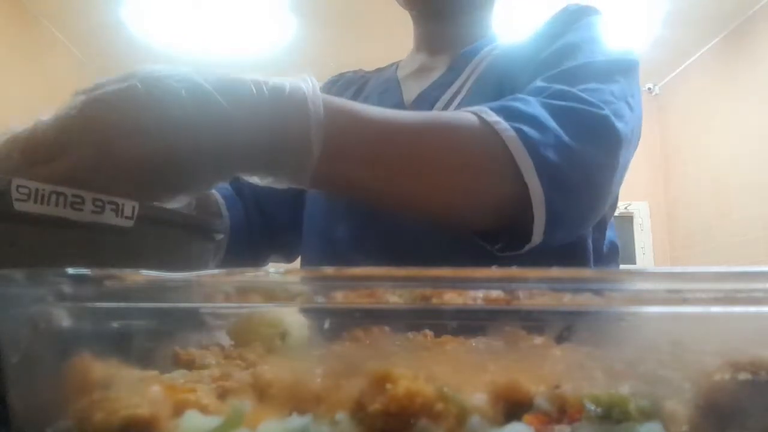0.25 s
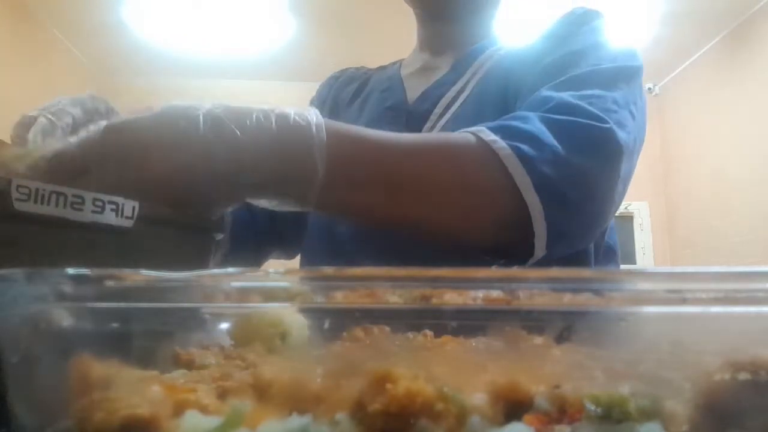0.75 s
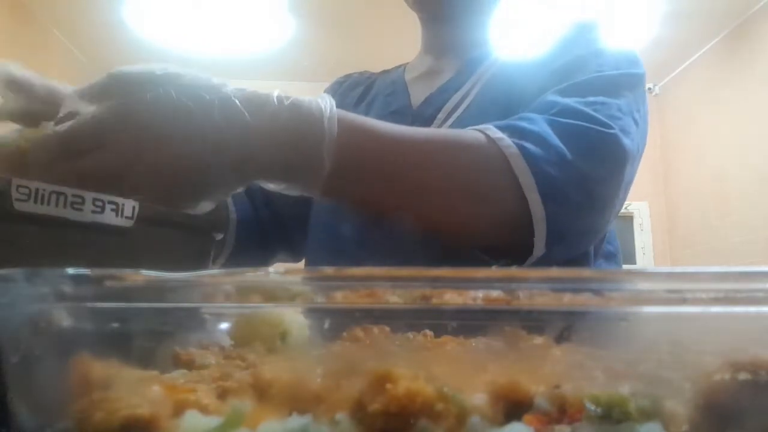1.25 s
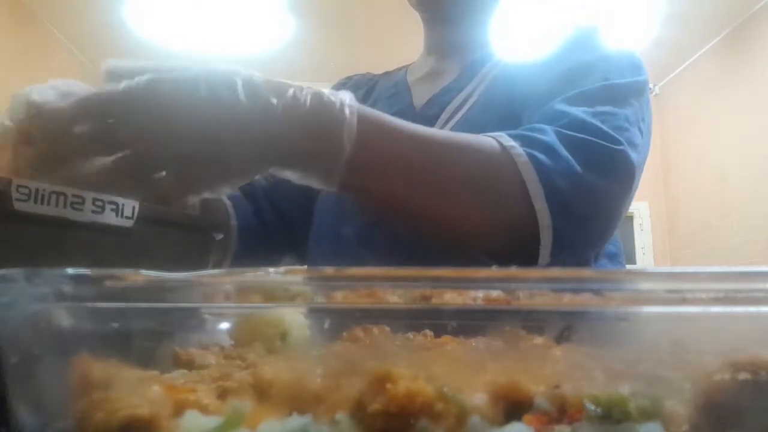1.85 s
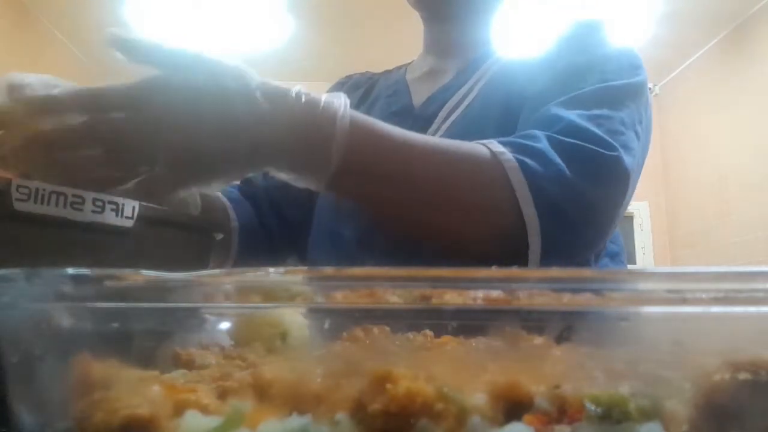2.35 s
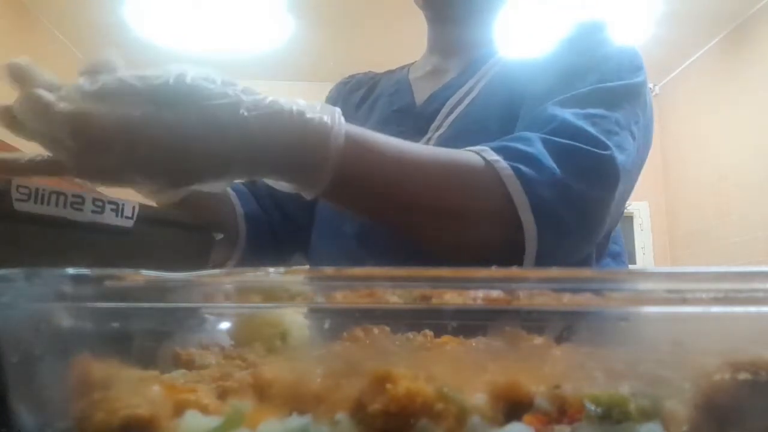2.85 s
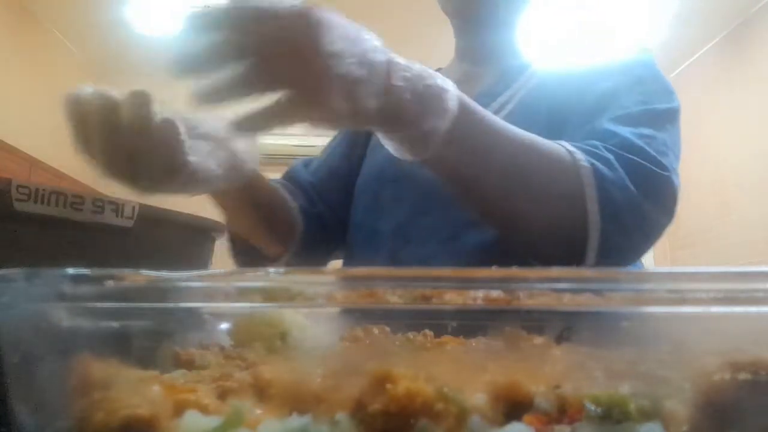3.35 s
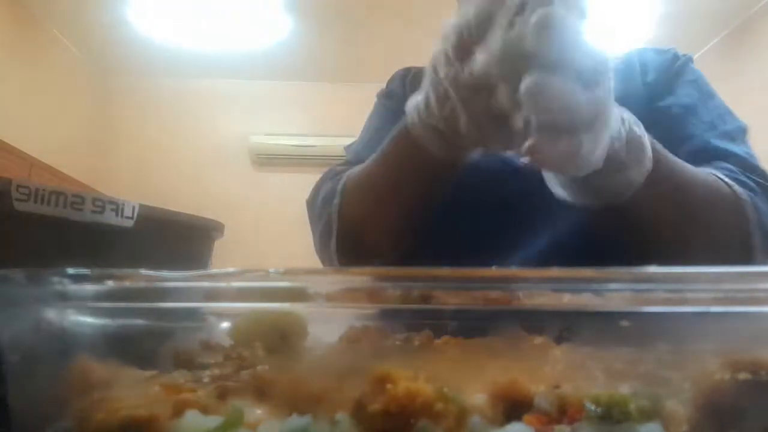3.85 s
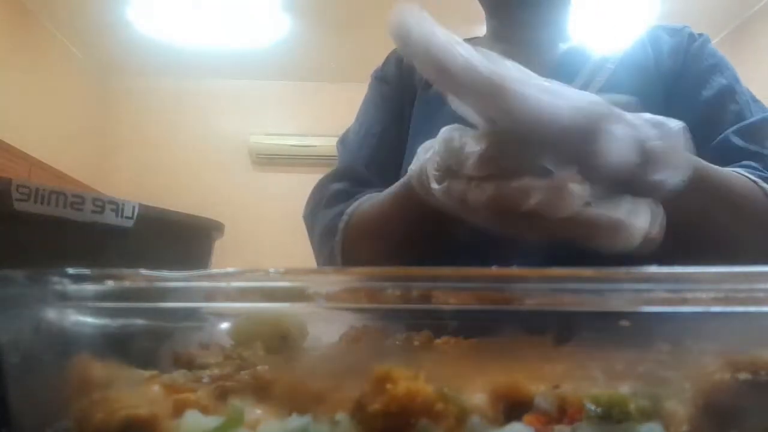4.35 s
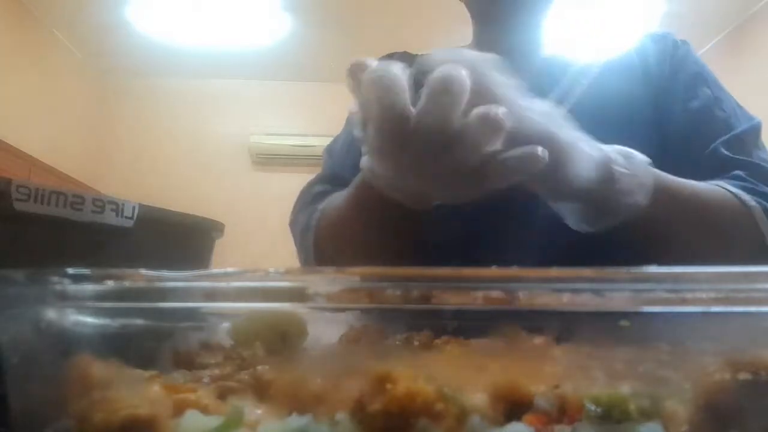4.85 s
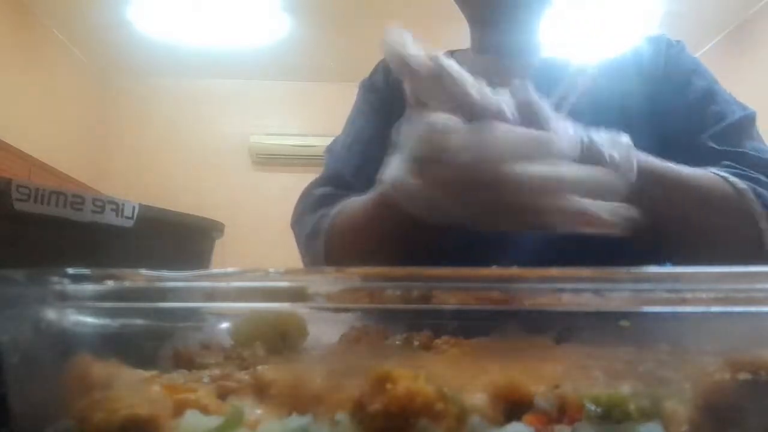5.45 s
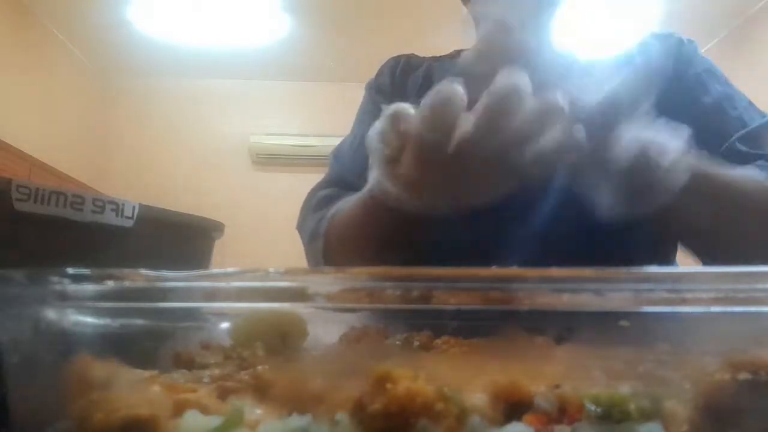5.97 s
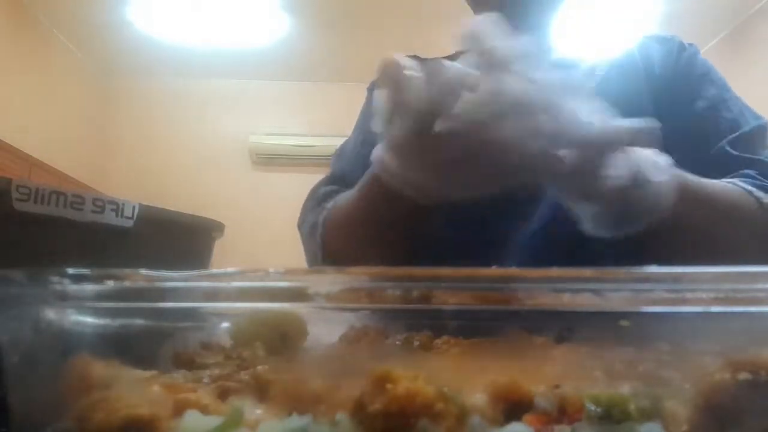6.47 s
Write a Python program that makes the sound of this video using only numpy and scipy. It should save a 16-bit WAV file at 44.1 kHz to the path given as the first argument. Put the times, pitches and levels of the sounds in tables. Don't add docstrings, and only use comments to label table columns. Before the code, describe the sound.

Steady air conditioner hum fills a hard-walled kitchen; close by, gloved hands pick lightly, then roll sticky food with crinkling film and tiny moist clicks.

```python
import sys
import numpy as np
from scipy import signal
from scipy.fft import rfft, irfft, next_fast_len
from scipy.io import wavfile
from scipy.ndimage import uniform_filter1d

SR = 44100
rng = np.random.default_rng(int(sys.argv[2]) if len(sys.argv) > 2 else 0)


def generate_wav(signal):
    frames = np.transpose(np.atleast_2d(signal))
    scaled = np.clip(frames, -1, 1) * 32767
    pcm = np.round(scaled).astype(np.int16)
    wavfile.write(sys.argv[1], SR, pcm)


def voltage_ratio(decibels):
    exponent = np.asarray(decibels, float) / 20
    return 10 ** exponent


N = 295847


def evened(x):
    return x / np.sqrt(np.mean(x ** 2) + 1e-20)


def read_curve(points, hz):
    point_hz, value = np.transpose(points)
    return np.interp(np.log(hz + 1), np.log(point_hz + 1), value)


def drift(top_hz):
    hz = np.geomspace(top_hz / 20, top_hz, num=16)
    phase = rng.random(16)
    t = np.arange(0, N + 512, 256) / SR
    sines = np.sin(2 * np.pi * (hz * t[:, None] + phase))
    slow = (sines / np.sqrt(hz)).sum(1)
    return np.interp(np.arange(N) / SR, t, evened(slow))


def diffuse(hz):
    # frequency_hz, likeness (-1 to 1)
    port_likeness = [(45, 0.88), (110, 1), (255, 0.81), (370, 0.88), (530, 0.33), (630, 0.46), (800, 0.063),
                     (1150, -0.3), (1450, -0.66), (1800, -0.0026), (2400, 0.51), (3100, -0.41),
                     (3600, -0.0046), (5800, -0.0077), (6500, 0.99)]
    return read_curve(port_likeness, hz)


def coloured(x, db_at, same_at):
    # frequency_hz, left_minus_right_db
    port_balance = [(60, -2), (99, 2), (160, -3), (270, 2), (450, -3), (740, -2), (1220, -1.5),
                    (2010, -4.5), (3330, -2.5), (5500, -1), (9080, 3.5), (15000, 0.5)]
    size = next_fast_len(N)
    hz = np.fft.rfftfreq(size, 1 / SR)
    a, b = rfft(x, size)
    angle = np.arccos(np.clip(same_at(hz), -1, 1)) / 2
    shared, opposed = np.cos(angle) * a, np.sin(angle) * b
    half_db = read_curve(port_balance, hz) / 2
    pair = [voltage_ratio(half_db) * (shared + opposed), voltage_ratio(-half_db) * (shared - opposed)]
    return evened(irfft(voltage_ratio(db_at(hz)) * pair, size)[:, :N])


def rumble():
    # frequency_hz, level_db (per Hz)
    turbulence = [(15, -56), (25, -47), (37, -13.5), (65, -9), (86, -2), (136, -0.5), (252, -8.5),
                  (310, -9.5), (375, -7.5), (460, -8), (506, -11.5), (622, -11), (789, -13.5), (867, -15),
                  (1100, -31.5), (1430, -45), (2420, -120)]
    # frequency_hz, width_hz, lift_db
    modes = [(82.5, 8, -3.5), (90.2, 7, -11), (117.4, 12.5, 1.5), (154, 26, 2), (200, 14, 2),
             (231.4, 29, 3), (266.5, 5.7, 0), (281.6, 9.8, 5), (294, 9.2, -5.5), (305, 8.7, 5),
             (349, 14.6, 3.5), (386, 69, 3), (431, 58, 1), (630, 24, 3.5), (870, 19, 4.5), (178, 30, -0.5),
             (410, 6.6, -3)]

    def colour(hz):
        lift = sum(db / (1 + (2 * (hz - mode_hz) / width) ** 2) for mode_hz, width, db in modes)
        return read_curve(turbulence, hz) + lift - 60 * np.clip(hz / 1100 - 1, 0, 2)

    air = voltage_ratio(-31.5) * coloured(rng.standard_normal((2, N)), colour, diffuse)
    low_pass = signal.butter(2, 175, fs=SR, output="sos")
    low = signal.sosfiltfilt(low_pass, air)
    surge_db, surge_hz = 1, 2.84
    return air + low * (voltage_ratio(surge_db * drift(surge_hz)) - 1)


def hum():
    # multiple of the shaft turn, level_db, waver_db, phase_smear_rad
    harmonics = [
        (1, -59, 0.5, 0.1),
        (2, -43.5, 0.28, 0.55),
        (3, -45, 3, 2.6),
    ]
    # time_s, second_multiple_hz, second_level_db, third_level_db
    motor_load = [(0.0, 96.3, -38, -21), (0.09, 96.4, -37, -56), (0.35, 97.8, -44, -32),
                  (0.54, 97.5, -55, -48), (0.61, 97.6, -35, -25), (1.08, 97.6, -41, -46),
                  (1.12, 97.6, -34, -66), (1.51, 97.6, -39.5, -31), (2.46, 97.3, -39.5, -31),
                  (3.02, 98.6, -48, -39), (3.36, 99.0, -30, -29), (3.49, 96.4, -41.5, -41.5),
                  (4.03, 96.2, -33.5, -42), (4.38, 99.0, -38, -35), (5.09, 97.5, -33.5, -40),
                  (6.16, 97.5, -50.5, -30), (6.53, 97.6, -31.5, -38), (6.7, 97.7, -35, -41)]
    shaft_hz, load_share = 48.56, 1
    time_s, second_hz, second_db, third_db = np.transpose(motor_load)
    t = np.arange(N) / SR
    speed_hz = shaft_hz + 0.37 * (np.interp(t, time_s, second_hz) - second_hz.mean()) / 2
    turns = np.cumsum(speed_hz * (1 + 0.0051 * drift(2.492))) / SR
    loads_db = [0 * t]
    for db in (second_db, third_db):
        loads_db.append(load_share * np.interp(t, time_s, db - db.mean()))
    tone = 0
    for (multiple, db, waver_db, smear), load_db in zip(harmonics, loads_db):
        level = voltage_ratio(db + load_db + waver_db * drift(3.05))
        tone = tone + level * np.cos(2 * np.pi * multiple * turns + smear * drift(14.0))
    return np.sqrt(2) * tone * voltage_ratio([[.4], [-.4]])


def hiss():
    # frequency_hz, level_db (per Hz)
    vane_noise = [(530, -35), (900, -2.5), (1120, -6.5), (1230, -4.5), (1580, -9), (1700, -8.5),
                  (2310, -15), (2600, -17), (2800, -18), (2950, -19.5), (3160, -22.5), (4060, -24),
                  (5030, -27), (7370, -35.5), (9250, -39.5), (12500, -38.5), (14300, -64), (15600, -58)]

    def colour(hz):
        return read_curve(vane_noise, hz) - 60 * np.clip(1 - hz / 900, 0, 1)

    return voltage_ratio(-44.5 + 0.68 * drift(8.0)) * coloured(rng.standard_normal((2, N)), colour, diffuse)


def stroke(t, start, length):
    rise, fall_db = 0.34, -18
    age = np.clip((t - start) / length, 0, 6)
    press = np.sin(np.pi / 2 * np.minimum(age / rise, 1)) ** 2
    return press * voltage_ratio(fall_db * np.maximum(age - rise, 0) / (1 - rise))


def gloves():
    # start_s, length_s, film_rustle_db, film_tightness (0 to 1), wet_squelch_db
    picks = [(0.115, 0.14, -74, .5, -70), (0.42, .05, -74, .5, -72), (0.91, 0.14, -58, 0.8, -70),
             (1.3, 0.1, -71, .5, -70), (1.45, 0.15, -76, .4, -67), (1.7, .08, -74, .3, -71),
             (1.78, .15, -71, .6, -67), (2.01, .13, -68, .5, -65), (2.22, .2, -78, .5, -77),
             (2.56, 0.11, -66, .6, -67), (2.71, 0.15, -70, .4, -68), (3.04, 0.26, -70, 0.1, -64),
             (3.4, 0.2, -72, .5, -67)]
    rolls = [(3.56, 0.12, -59, .5, -60), (3.61, 0.16, -66, .6, -64), (3.66, 0.14, -66, .6, -68),
             (3.71, 0.087, -67, 0.64, -66), (3.735, .05, -71, .8, -72), (3.77, 0.15, -66, .5, -59),
             (4.16, .05, -68, .5, -65), (3.85, 0.089, -58, 0.71, -65), (3.94, .08, -71, .5, -68),
             (4.0, .12, -76, .7, -75), (4.08, 0.18, -58, 0.87, -70), (4.35, 0.09, -55, 0.71, -56),
             (4.4, 0.059, -61, 0.99, -66), (4.45, 0.22, -82, .6, -76), (4.66, 0.24, -69, .5, -70),
             (4.82, 0.21, -58, 0.3, -60), (4.93, 0.24, -69, 0.4, -66), (5.17, 0.076, -69, 0.41, -68),
             (5.22, 0.11, -62, .6, -63), (5.44, .12, -68, .5, -67), (5.55, .1, -65, .5, -66),
             (5.65, 0.11, -68, .6, -64), (5.76, 0.17, -84, .7, -88), (5.98, 0.14, -58, 0.77, -69),
             (6.05, 0.074, -73, 0.65, -72), (6.1, .11, -70, 0.6, -76), (6.19, .05, -68, 0.96, -76),
             (6.25, 0.16, -66, .4, -62), (6.37, .08, -74, 0.67, -75), (6.44, .08, -66, 0.72, -65),
             (6.51, 0.14, -68, 1, -63), (6.625, 0.06, -59, 0.77, -62)]
    # start_s, peak_db
    film_slips = [(2.5994, -54), (3.0949, -57), (3.574, -45), (3.6694, -57), (3.6994, -59), (3.746, -45),
                  (3.8744, -49), (3.9544, -54), (4.0994, -56), (4.3735, -43), (4.4094, -50), (4.73, -53),
                  (4.8818, -52), (4.9394, -47), (4.96, -56), (5.0479, -52), (5.2444, -51), (5.5494, -56),
                  (5.59, -55), (5.6794, -55), (5.9943, -50), (6.0194, -51), (6.1294, -48), (6.3494, -61),
                  (6.48, -43), (6.6394, -52)]
    # start_s, length_s, level_db
    squeezes = [
        (0.93, .1, -66),
        (3.575, .07, -68),
        (3.865, .06, -66),
        (4.88, 0.14, -55.5),
        (5.24, .06, -66),
        (6.0, .08, -66),
    ]
    # frequency_hz, level_db (per Hz)
    tight_colour = [(8000, -28), (10000, -13), (11500, 1), (13500, -2), (14500, 2), (15700, -2.5)]
    slack_colour = [(4500, -17), (6000, 4), (7500, 1.5), (8300, -1), (10000, 1.5), (12300, 1.5),
                    (14000, -3), (15700, -3.5)]
    wet_colour = [(2500, -15), (3700, 0.5), (4600, -1.5), (5500, 1.5), (7000, -14), (9000, -9.5)]
    palm_colour = [(6000, -12), (7300, -4), (9000, -6), (11000, -2), (12200, 0), (13300, -4), (14500, -12),
                   (15700, -16)]

    t = np.arange(0, N + 64, 32) / SR
    rest_film_db, rest_wet_db = -81.5, -68
    tight = voltage_ratio(rest_film_db) * np.ones(len(t))
    slack = voltage_ratio(rest_film_db) * np.ones(len(t))
    wet = voltage_ratio(rest_wet_db) * np.ones(len(t))
    for start, length, film_db, tightness, wet_db in picks + rolls:
        press = stroke(t, start, length)
        turn = np.pi / 2 * np.clip(tightness, 0, 1)
        tight = tight + voltage_ratio(film_db) * np.sin(turn) * press
        slack = slack + voltage_ratio(film_db) * np.cos(turn) * press
        wet = wet + voltage_ratio(wet_db) * press
    slips, slip_s = 0, 0.028
    for start, db in film_slips:
        age = np.clip((t - start) / slip_s, 0, 30)
        slips = slips + voltage_ratio(db - 23) * np.tanh(age * 8) * np.exp(-age ** 2)
    palm = sum(voltage_ratio(db) * stroke(t, start, length) for start, length, db in squeezes)

    envelopes = (tight, slack, wet, slips, palm)
    tight, slack, wet, slips, palm = (np.interp(np.arange(N) / SR, t, v) for v in envelopes)
    clumps = voltage_ratio(3.2 * np.tanh(.7 * drift(400.0) + .2 * drift(60.0)))
    layers = (
        (tight * clumps + .8 * slips, tight_colour, .75),
        (1.23 * slack * clumps + 0.73 * slips, slack_colour, .7),
        (wet * voltage_ratio(0.89 * drift(100.0)), wet_colour, .3),
        (palm * voltage_ratio(1.5 * drift(300.0)), palm_colour, .8))
    out = 0
    for level, colour, same in layers:
        crease_size_db = 4.4 * np.minimum(rng.exponential(1, N), 3.0)
        creases = rng.standard_normal((2, N)) * voltage_ratio(crease_size_db)
        out = out + level * coloured(creases, lambda hz: read_curve(colour, hz), lambda hz: same + 0 * hz)
    return out


def ticks():
    # start_s, peak_db, body_db (relative), body_pitch_hz, left_minus_right_db
    releases = [(0.4444, -48, -13, 3500, 1.5), (0.852, -46, -10, 4450, 7), (1.2815, -48.5, -3, 6230, 14),
                (2.5855, -51, -5, 4020, 1.5), (3.0744, -55, 2, 3770, 2.5), (3.5757, -52, -2, 6500, 2.5),
                (3.8711, -48, -3, 4690, -0.5), (4.1664, -53, -1, 7430, 0.5), (4.2438, -48, -5, 4060, 9),
                (4.2961, -42, -17, 4570, 11), (4.8484, -42, -9, 6550, 3), (4.851, -50, -6, 6800, 2),
                (4.677, -55, -8, 5000, 1), (5.218, -55, -8, 5000, 1), (5.552, -55, -4, 7200, 1),
                (5.598, -55, -7, 6000, 1), (4.732, -54, -8, 5000, 2), (4.8817, -49, -10, 7000, 0.5),
                (4.982, -51, -12, 5000, 1), (5.0104, -52, -8, 7000, 1.5), (5.0478, -50, -10, 5000, 1),
                (5.088, -54, -8, 5070, 1), (5.212, -53, -10, 5000, 1), (5.9977, -52, -8, 5000, 0),
                (6.395, -54, -8, 5000, 0), (5.1726, -46, -13, 3850, 11), (5.1854, -52, -9, 3670, 1.0),
                (5.2924, -51, -6, 3700, 0.5), (5.459, -49, -10, 7550, -0.5), (6.0467, -47, -4, 4450, 0.5),
                (6.1639, -49, -13, 4860, 6), (6.1913, -48, -13, 3890, 10), (6.2677, -50, -2, 3720, 1.0),
                (6.297, -50, 0, 4830, 1.5), (6.442, -39, -16, 5480, 7), (6.4852, -49, -5, 4400, 1.0),
                (6.5385, -51, -9, 3680, -0.5), (6.5779, -50, -9, 5100, -2.0)]
    out = np.zeros((2, N + 2000))
    t = np.arange(1300) / SR
    bright = signal.butter(3, [10800, 17500], "band", fs=SR, output="sos")
    noise = rng.standard_normal((len(releases), 2, len(t)))
    for (start, db, body_db, hz, pan_db), (film, body) in zip(releases, noise):
        snap = signal.sosfilt(bright, film * (np.exp(-t / 0.0024) + 0.22 * np.exp(-t / 0.0059)))
        rough = uniform_filter1d(body - uniform_filter1d(body, size=12), size=3)
        ring = 0.55 * np.sin(2 * np.pi * hz * t) + 1.34 * rough
        ring = ring * (np.exp(-t / 0.0019) + 0.28 * np.exp(-t / 0.011))
        tick = voltage_ratio(db) * (snap / abs(snap).max() + voltage_ratio(body_db) * ring)
        at = round(start * SR)
        out[:, at:at + len(t)] += tick * voltage_ratio([[pan_db / 2], [-pan_db / 2]])
    return out[:, :N]


def smacks():
    # start_s, peak_db, pitch_hz
    pockets = [(1.0794, -60, 3710), (1.2815, -51, 6100), (3.078, -52, 5300), (3.152, -54, 7200),
               (3.6644, -52, 4060), (4.1694, -50, 4320), (4.4394, -52, 4650), (5.9733, -51, 3700),
               (6.0477, -45, 4440), (6.0674, -54, 4760), (6.2622, -48, 4430), (6.3094, -51, 4850),
               (6.324, -47, 4140), (6.3494, -56, 5540), (6.4418, -50, 4530), (6.6209, -47, 4130)]
    out = np.zeros(N + 2000)
    t = np.arange(900) / SR
    rough = uniform_filter1d(rng.standard_normal((len(pockets), len(t))), size=20)
    for (start, db, hz), wobble in zip(pockets, rough):
        cycles = np.sin(2 * np.pi * hz * t + 4.4 * wobble)
        at = round(start * SR)
        out[at:at + len(t)] += voltage_ratio(db) * cycles * np.tanh(t / 0.0014) * np.exp(-t / 0.006)
    return out[:N]


def scene():
    return rumble() + hum() + hiss() + gloves() + ticks() + smacks()


def top_cut(x):
    return signal.sosfilt(signal.butter(12, 15760, fs=SR, output="sos"), x)


def record(dry):
    # frequency_hz, gain_db
    microphone = [(22, -3), (31, -4), (38, -13), (45, 0), (6000, 0), (7250, 3.5), (7500, 6), (7750, 2),
                  (8200, -0.5), (10500, -2.5), (12500, -1.5), (13100, 1), (13500, -2), (14500, -0.5),
                  (15000, -5)]
    size = next_fast_len(N + 4096)
    hz = np.fft.rfftfreq(size, 1 / SR)
    edge_db = -.2 * np.clip(hz - 15750, 0, 300)
    response = voltage_ratio(read_curve(microphone, hz) + edge_db)
    heard = irfft(rfft(dry, size) * response, size)[:, :N]
    return top_cut(heard)


dry = scene()
out = record(dry)
generate_wav(out)
```